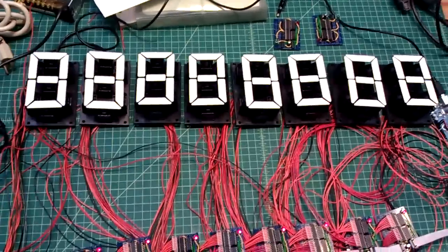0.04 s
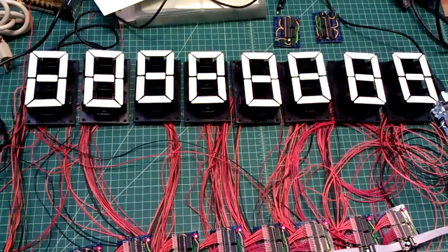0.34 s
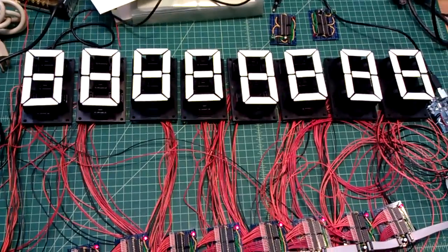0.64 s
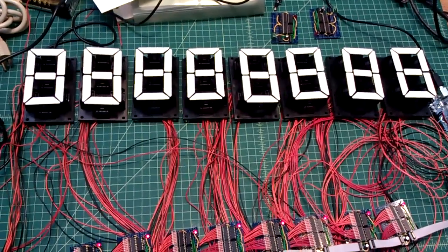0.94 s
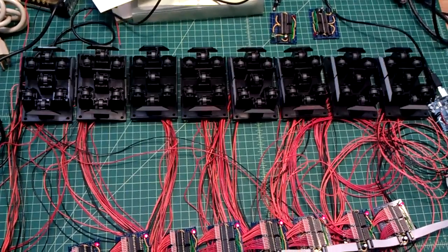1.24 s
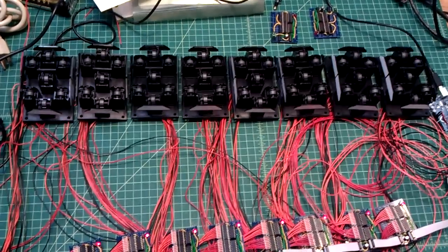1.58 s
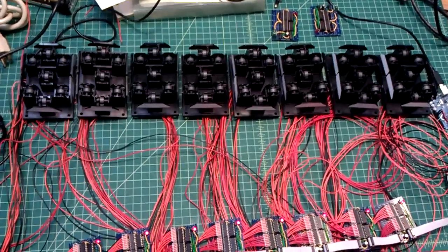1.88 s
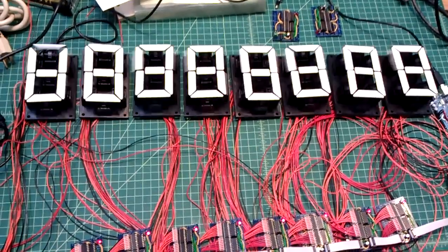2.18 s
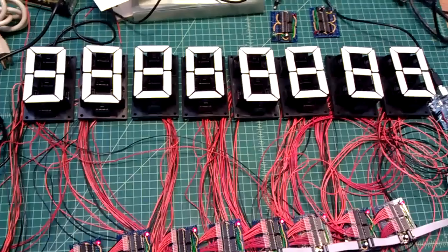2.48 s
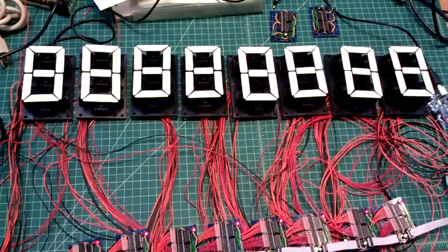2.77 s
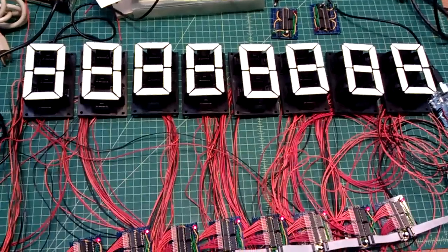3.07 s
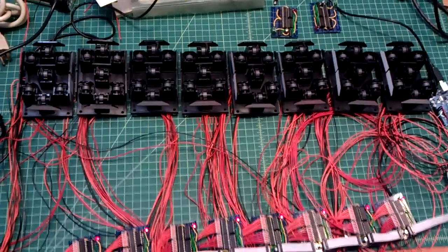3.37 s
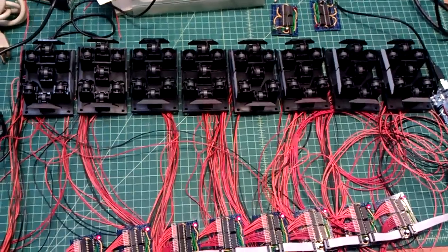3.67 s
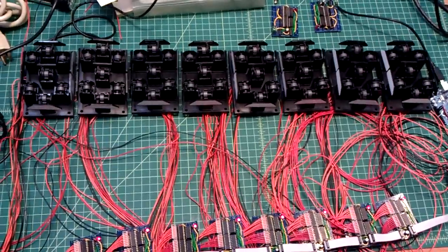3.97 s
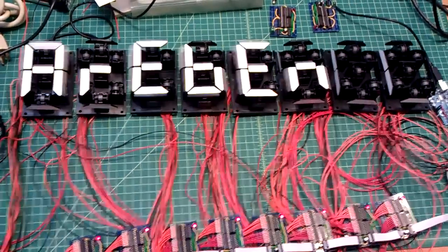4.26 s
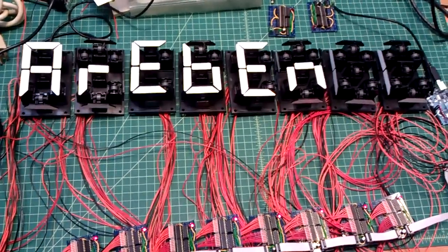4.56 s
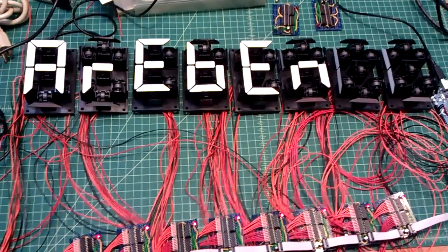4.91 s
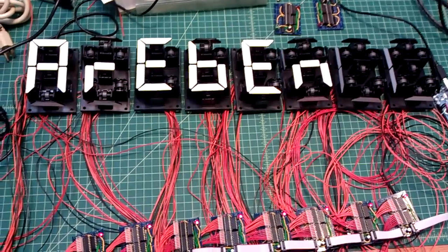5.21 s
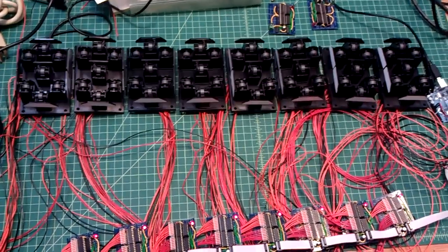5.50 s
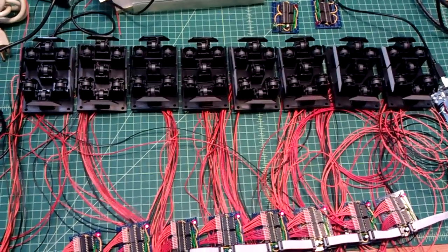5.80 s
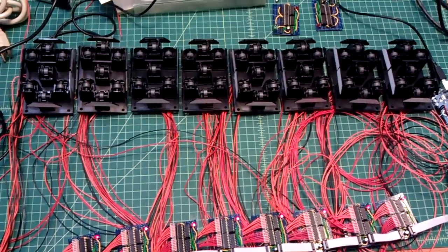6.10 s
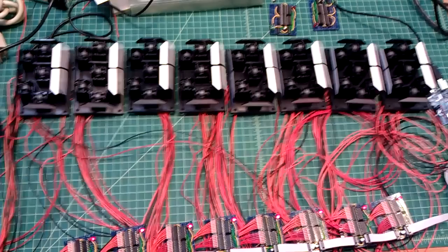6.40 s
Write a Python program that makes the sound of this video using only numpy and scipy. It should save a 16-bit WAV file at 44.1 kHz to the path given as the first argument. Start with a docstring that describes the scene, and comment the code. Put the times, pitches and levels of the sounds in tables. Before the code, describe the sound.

Plastic display segments flip over in seven short, rattling clacks, evenly paced, over a faint indoor hum and hiss.

```python
"""On a workbench, a row of eight electromagnetic seven-segment digits flips about once a second,
white side out, then away again. Each time, the segments tick loose, rattle as they swing, and
clack onto their plastic stops in a ragged burst of some 30 ms that also thumps the bench.
The room rings on over a faint hum and soft background noise. The microphone misses the high
treble and overloads on the hardest landings, and the bass dips after loud sounds."""
import sys
import numpy as np
from scipy import signal
from scipy.fft import rfft, irfft, next_fast_len
from scipy.io import wavfile
from scipy.ndimage import uniform_filter1d

SR = 44100
rng = np.random.default_rng(int(sys.argv[2]) if len(sys.argv) > 2 else 0)


def master_out(mix):
    """Clip the mix to full scale and print it as 16-bit PCM to the path in sys.argv[1]."""
    frames = np.transpose(np.atleast_2d(mix))
    ceiling = np.clip(frames, -1, 1)
    pcm = np.round(ceiling * 32767).astype(np.int16)
    wavfile.write(sys.argv[1], SR, pcm)


N = 293265
DIGITS = 8

# Each flip of the display: (first landing [s], folding away [0/1], peak level [dB], thud against
# clack [dB], time to the hardest landing [s], weakening after it [dB/s], boosted pitch [Hz])
FLIPS = [(0.1590, 0, -2, -14.5, .006, 601, 2736), (1.2174, 1, -0.5, -4, 0.0086, 340, 2315),
         (2.2905, 0, -0.6, -10.5, .013, 539.5, 1800), (3.3460, 1, 2.5, -2.5, .009, 680.5, 3400),
         (4.4160, 0, -1.84, -8, 0.0067, 620.5, 2138), (5.4733, 1, -1.47, -10.5, 0.0058, 470.5, 3600),
         (6.546, 0, -5, -8, 0.0084, 718, 2050)]


def from_db(db):
    """Turn decibels into a number to multiply a sound by."""
    return 10 ** (np.asarray(db) / 20)


def at_hz(table, hz, column=1):
    """Read a table at any pitch, blending between its rows."""
    table = np.array(table)
    return np.interp(np.log(hz + 1e-9), np.log(table[:, 0]), table[:, column])


def coloured(sound, spectrum):
    """Make each pitch louder or softer, as a table says."""
    size = next_fast_len(N + SR)
    gain = from_db(at_hz(spectrum, np.fft.rfftfreq(size, 1 / SR)))
    return irfft(rfft(sound, size) * gain, size)[:N]


def band_noise(low_hz, high_hz, size):
    """Noise between two pitches."""
    band = signal.butter(2, [low_hz, high_hz], "band", fs=SR, output="sos")
    return signal.sosfilt(band, rng.standard_normal(size))


def add(track, start_s, sound):
    """Mix a sound into a track at a given time."""
    place = track[..., int(start_s * SR):][..., :sound.shape[-1]]
    place += sound[..., :place.shape[-1]]


def fade(t, fade_s):
    """Die away by 60 dB in fade_s, the fade time."""
    return np.exp(-np.log(1000) * t / np.abs(fade_s))


def drift(count):
    """A slow wander through count random points, about 1 in size."""
    return np.interp(np.linspace(0, count - 1, N), np.arange(count), rng.standard_normal(count))


def air():
    """The smooth background noise of the workspace."""
    # Tone of the noise: (pitch [Hz], relative level [dB])
    spectrum = [(25, -15), (50, -11.5), (85, 0), (140, -4), (300, 1), (480, -4.5), (750, -8), (1000, -8.5),
                (1220, -6.5), (1500, -7.5), (2100, -7.5), (2800, -16.5), (3600, -18), (4400, -28.5)]
    noise = coloured(rng.standard_normal(N), spectrum)
    return from_db(-58.5) * noise / noise.std()


def hum(waver_db, phase_wander):
    """Electrical hum: low tones that waver slightly."""
    # Tones of the hum: (pitch [Hz], average level [dB])
    tones = [(119, -68), (150.7, -74.5), (163, -71), (184, -73.5), (226.5, -67.5), (301.5, -65.5),
             (455, -77), (499, -76)]
    t = np.arange(N) / SR
    out = np.zeros(N)
    for hz, level_db in tones:
        gain = np.sqrt(2) * from_db(level_db + waver_db * drift(count=24))
        out += gain * np.sin(2 * np.pi * hz * t + phase_wander * drift(count=20))
    return out


def room(digits, echo_db, echo_fade_s, build_s, echoes):
    """Each digit's sound bounces around the room: a few distinct echoes and a smooth, fading tail."""
    # The room's tail: (pitch [Hz], fade time [s], level against the direct sound [dB])
    tail = [(99.3, .4, -16), (400, 0.68, -12.5), (1000, 0.5, -15.5), (1600, .58, -11.5), (2400, 0.64, -10),
            (3351, .57, -12), (4500, 0.6, -6.5)]
    t = np.arange(SR * 3 // 4) / SR
    responses = np.zeros((DIGITS, len(t)))
    edges_hz = np.geomspace(50, 6400, 15)
    for low, high in zip(edges_hz, edges_hz[1:]):
        hz = np.sqrt(low * high)
        shape = fade(t, at_hz(tail, hz)) * (1 - np.exp(-(t / build_s) ** 2))
        gain = from_db(at_hz(tail, hz, column=2)) / np.linalg.norm(shape)
        responses += gain * shape * band_noise(low, high, responses.shape)
    for response in responses:
        delays = .005 + .06 * (np.arange(echoes) + rng.random(echoes)) / echoes
        gains = from_db(echo_db) * fade(delays, echo_fade_s)
        response[(delays * SR).astype(int)] += gains * rng.choice([-1, 1], echoes)
    return signal.oaconvolve(digits, responses, axes=1).sum(axis=0)[:N]


def strike(hz, fade_s, level_db, scatter_db, detune):
    """A struck part rings with several fading tones, tuned and mixed a little differently each time."""
    t = np.arange(SR // 16) / SR
    gains = from_db(level_db + scatter_db * rng.standard_normal(len(hz)))
    gains *= rng.choice([-1, 1], len(hz))
    pitches = hz * (1 + detune * rng.standard_normal(len(hz)))
    return gains @ (np.sin(2 * np.pi * pitches[:, None] * t) * fade(t, fade_s[:, None]))


def clack(folding, boost_hz=2500, boost_db=1.5, boost_octaves=.41, grit_db=-9, grit_fade_s=.027):
    """A segment hits its front stop (the back one if folding): a gritty contact and a short ring."""
    # Tones of the plastic segment and frame:
    # (pitch [Hz], fade time [s], relative level at the front stop [dB], at the back stop [dB])
    plastic_tones = [(1240, .012, -18.5, -15.5), (1553.4, 0.022, -11, -5.5), (1702, .022, -2.5, -4),
                     (1917, 0.019, -5, -7), (2037, .022, -0.5, 1), (2264, 0.02, -2, -4),
                     (2454, 0.018, -2, -1), (2660, 0.021, -1, -6), (2851, 0.013, -3.5, 0.5),
                     (3076, 0.032, -5.5, -6), (3273, 0.051, -7.5, -1), (3514, .016, 0, 0.5),
                     (3898, 0.012, -6, 0)]
    hz, fade_s, front_db, back_db = np.transpose(plastic_tones)
    lift_db = boost_db * np.exp(-(np.log2(hz / boost_hz) / boost_octaves) ** 2)
    level_db = (back_db if folding else front_db) + lift_db
    ring = strike(hz, fade_s, level_db, scatter_db=2, detune=.017)
    grit = band_noise(1500, 3200, len(ring)) * fade(np.arange(len(ring)) / SR, grit_fade_s)
    sound = ring / np.abs(ring).max() + from_db(grit_db) * grit
    return sound / np.abs(sound).max()


def swings(release_s, rattle_rise_db):
    """The digits tick loose in turn, then their pivots rattle louder as the swing speeds up."""
    # The two swings: (length [s], release tick [dB], rattle at mid-swing [dB])
    swing_out, swing_away = (.034, -55.5, -41), (.028, -31.5, -38)
    out = np.zeros((DIGITS, N))
    for landing_s, folding, *_ in FLIPS:
        length_s, tick_db, mid_db = swing_away if folding else swing_out
        start_s = landing_s - length_s
        for digit, progress in zip(out, (np.arange(DIGITS) + rng.random(DIGITS)) / DIGITS):
            rattle_db = mid_db + rattle_rise_db * (progress - .5)
            add(digit, start_s + release_s * progress, from_db(tick_db) * clack(folding=False))
            add(digit, start_s + length_s * progress, from_db(rattle_db) * clack(folding=False))
    return out


def late_segments():
    """Now and then a segment lags behind the rest and lands hard on its front stop."""
    # Late landings: (time [s], peak level [dB])
    late_clacks = [(0.183, -8), (2.3296, -16), (4.4397, -13)]
    out = np.zeros((DIGITS, N))
    for digit, (start_s, peak_db) in zip(out, late_clacks):
        add(digit, start_s, from_db(peak_db) * clack(folding=False))
    return out


def burst_pattern(hardest_s, fall_db_per_s, count, gap_s=.0018, gap_growth=1.075, first_db=-8):
    """Delays [s] and strengths [dB] of the landings: they build quickly, then thin out and weaken."""
    gaps = gap_s * gap_growth ** np.arange(count) * (1 + .4 * rng.uniform(-1, 1, count))
    delays = np.cumsum(gaps) - gaps[0]
    build_db = first_db * np.maximum(1 - delays / hardest_s, 0)
    fall_db = fall_db_per_s * np.maximum(delays - hardest_s, 0)
    scatter_db = 2.18 * rng.standard_normal(count)
    return zip(delays, build_db - fall_db + scatter_db)


def landings():
    """The digits land in turn; each landing also knocks a base plate against the bench."""
    # Tones of the base plates on the bench: (pitch [Hz], fade time [s], relative level [dB])
    bench_tones = [(90, 0.039, -38.5), (202, 0.099, -32.5), (344, .025, -33), (560, 0.017, -28.5),
                   (805, 0.011, -21), (980, 0.015, -25.5)]
    out = np.zeros((DIGITS, N))
    for start_s, folding, peak_db, thud_db, hardest_s, fall_db_per_s, boost_hz in FLIPS:
        burst = np.zeros((DIGITS, SR // 4))
        for k, (delay, strength_db) in enumerate(burst_pattern(hardest_s, fall_db_per_s, count=15)):
            thud = strike(*np.transpose(bench_tones), scatter_db=1.5, detune=.11)
            landing = clack(folding, boost_hz) + from_db(thud_db) * thud
            add(burst[k % DIGITS], delay, from_db(strength_db) * landing)
        add(out, start_s, from_db(peak_db) * burst / np.abs(burst.sum(axis=0)).max())
    return out


def dip_bass(sound, below_hz=610, threshold_db=-47, share=.13, react_s=.06, forget_db_per_s=89.5):
    """The recorder turns the bass down after a loud sound, then slowly brings it back."""
    level_db = 10 * np.log10(np.abs(uniform_filter1d(sound ** 2, size=441)) + 1e-12)
    excess_db = np.maximum(level_db - threshold_db, 0)
    # Remember each loud peak and let it sink steadily.
    ramp_db = forget_db_per_s * np.arange(N) / SR
    held_db = np.maximum.accumulate(excess_db + ramp_db) - ramp_db
    smoothing = np.exp(-1 / (react_s * SR))
    cut_db = share * signal.lfilter([1 - smoothing], [1, -smoothing], held_db)
    bass = signal.sosfiltfilt(signal.butter(2, below_hz, fs=SR, output="sos"), sound)
    return sound + (from_db(-cut_db) - 1) * bass


def scene():
    """The display, its room and the background, in one channel."""
    digits = landings() + swings(release_s=.0063, rattle_rise_db=17) + late_segments()
    room_sound = room(digits, echo_db=-19.5, echo_fade_s=.19, build_s=.012, echoes=10)
    return (digits.sum(axis=0) + room_sound + hum(waver_db=2.5, phase_wander=.51) + air())[None]


def record(dry):
    """The microphone hears little above 4 kHz; overload flattens the top peaks into a bright crack."""
    # What the microphone lets through: (pitch [Hz], level [dB])
    microphone = [(3500, 0), (4000, -5.5), (4300, -10.5), (4600, -31), (4900, -66), (6000, -90)]
    rumble_cut = signal.butter(2, 55, "high", fs=SR, output="sos")
    top_cut = signal.ellip(10, .1, 80, 16000, fs=SR, output="sos")
    muffled = signal.sosfilt(rumble_cut, coloured(dry[0], microphone))
    overloaded = np.clip(dip_bass(muffled), -.72, .72)
    return signal.sosfilt(top_cut, overloaded)[None]


dry = scene()
out = record(dry)
master_out(out)
```